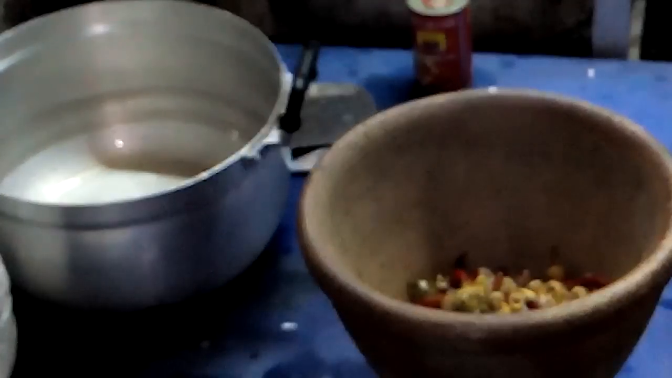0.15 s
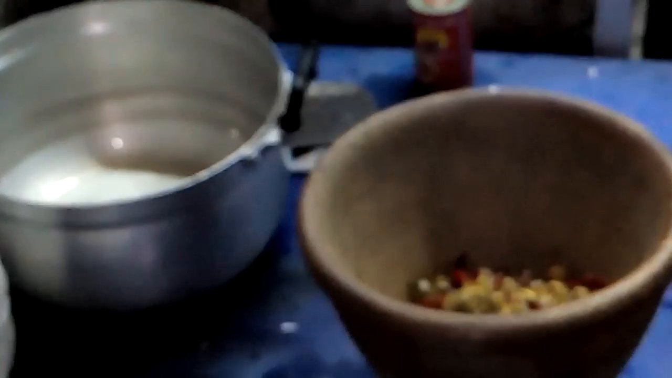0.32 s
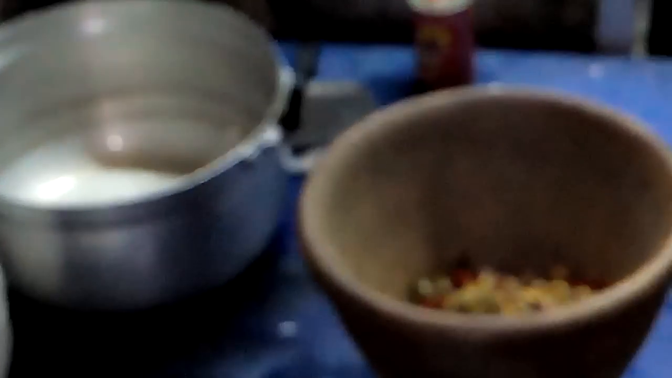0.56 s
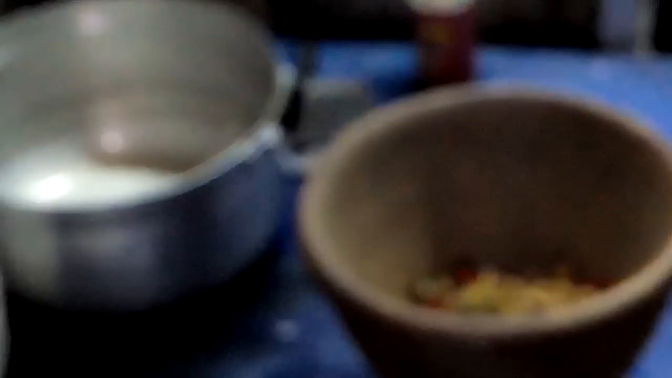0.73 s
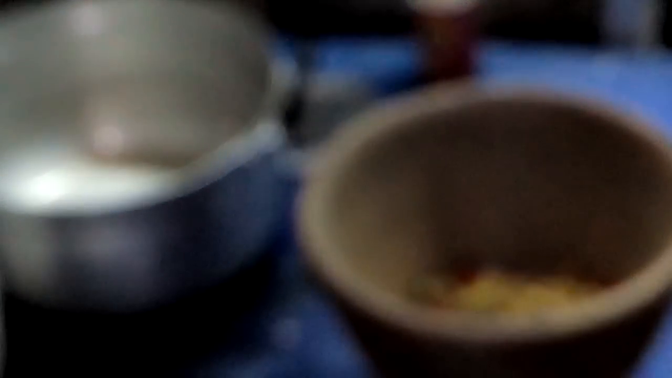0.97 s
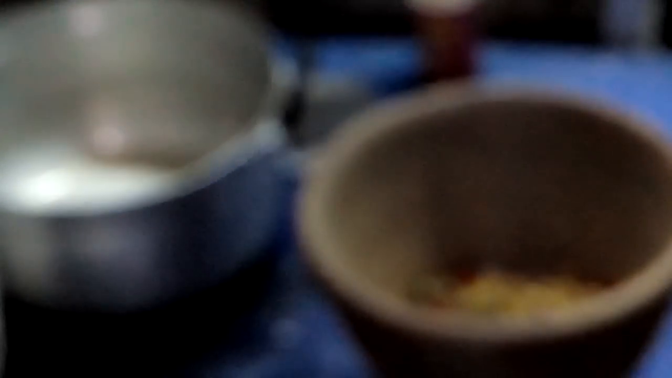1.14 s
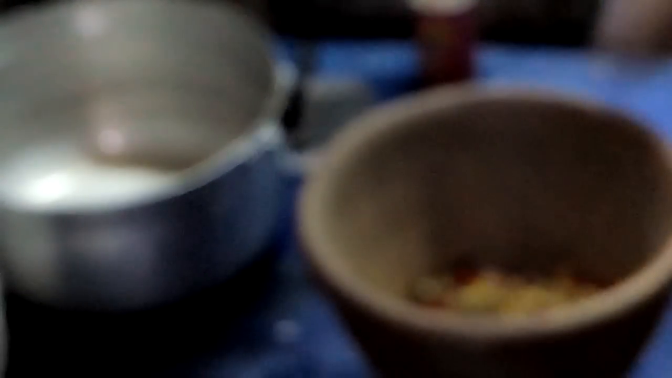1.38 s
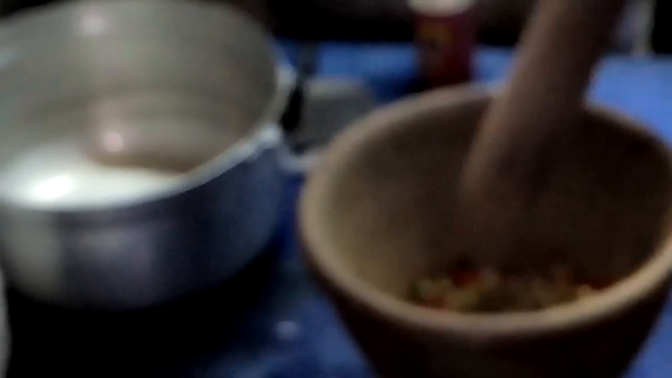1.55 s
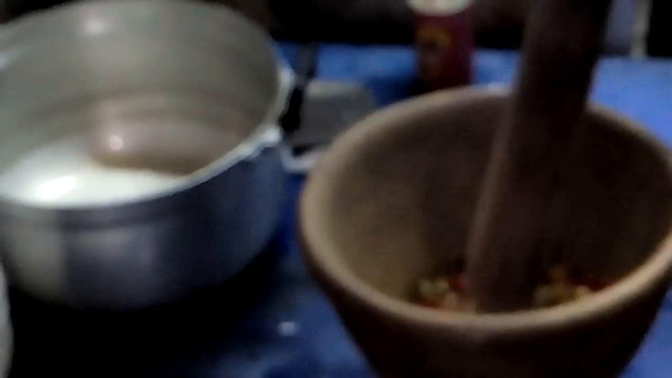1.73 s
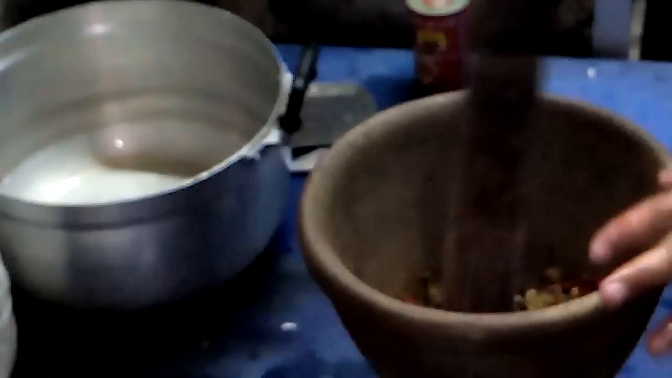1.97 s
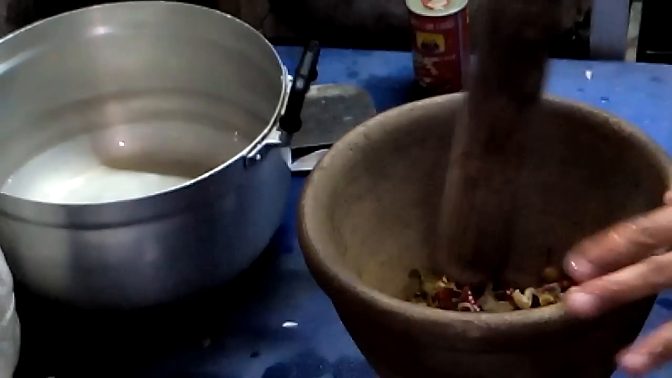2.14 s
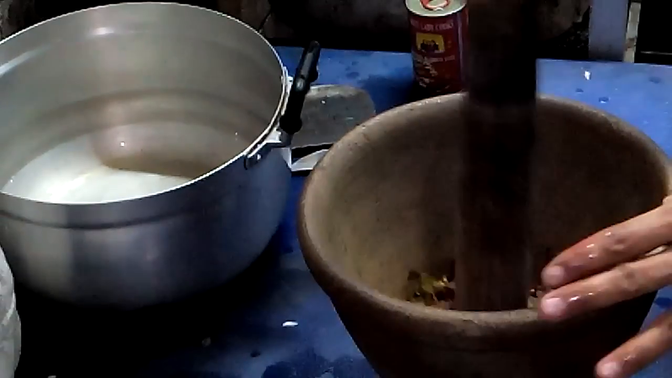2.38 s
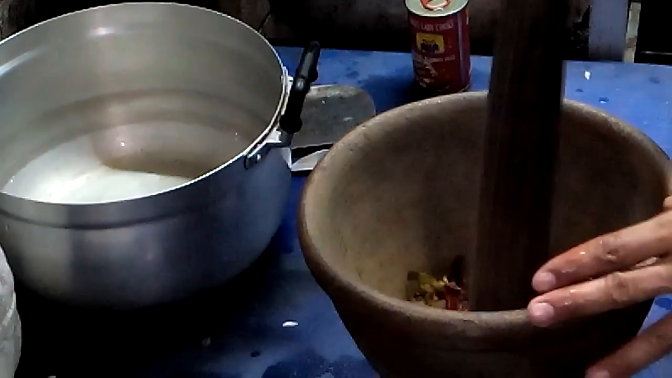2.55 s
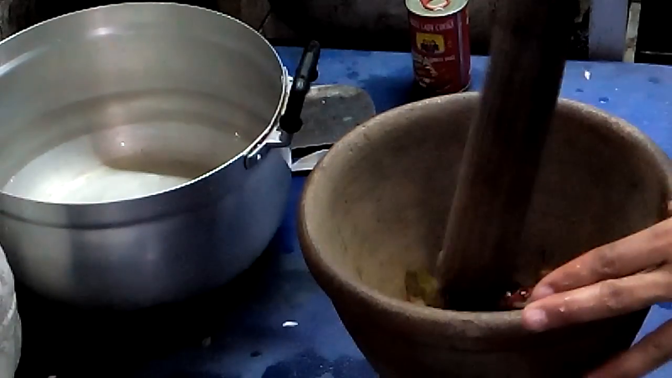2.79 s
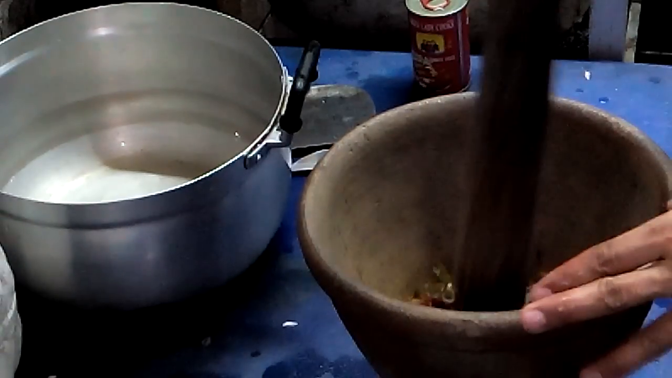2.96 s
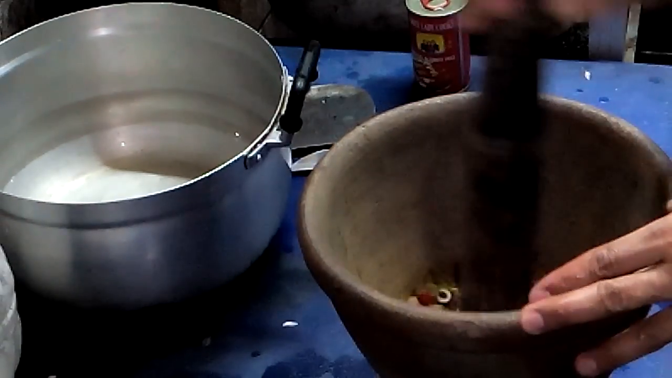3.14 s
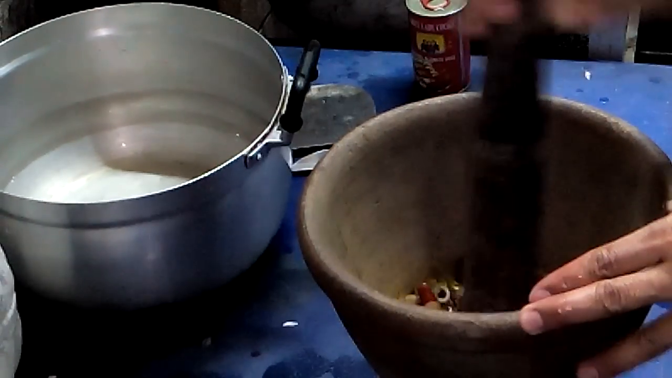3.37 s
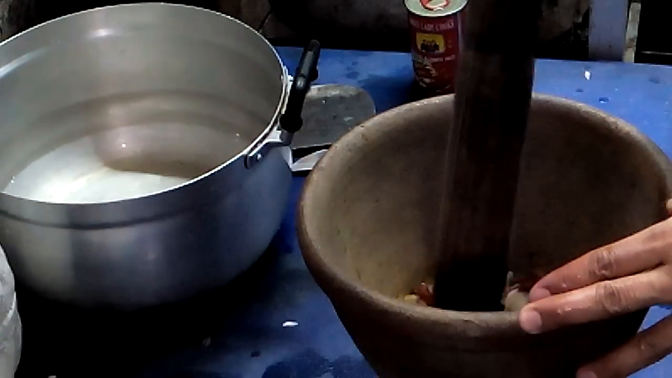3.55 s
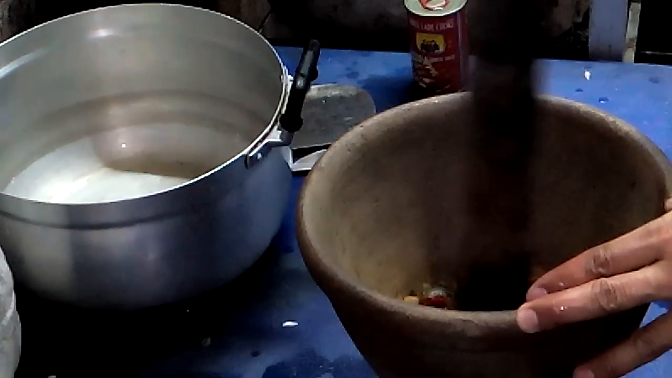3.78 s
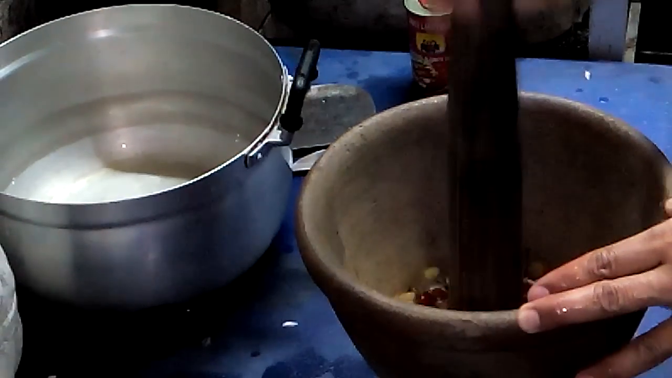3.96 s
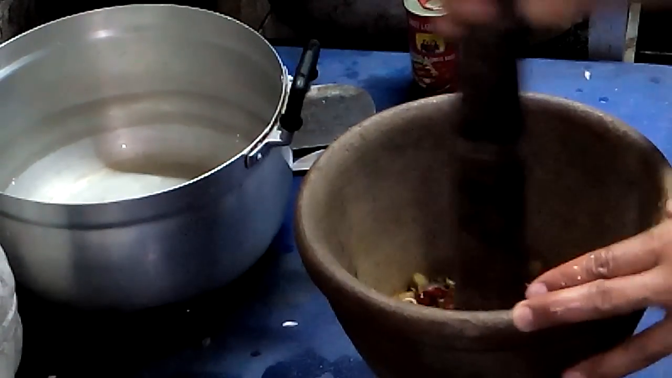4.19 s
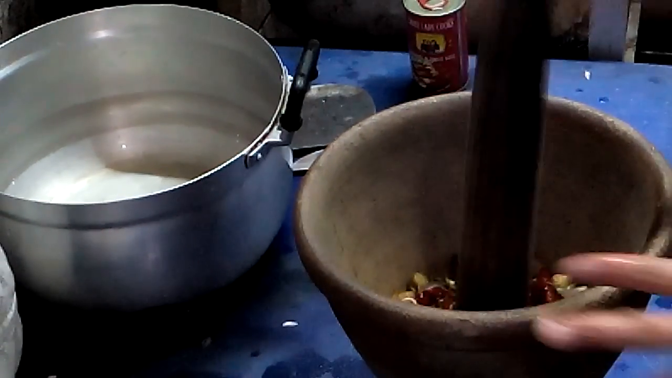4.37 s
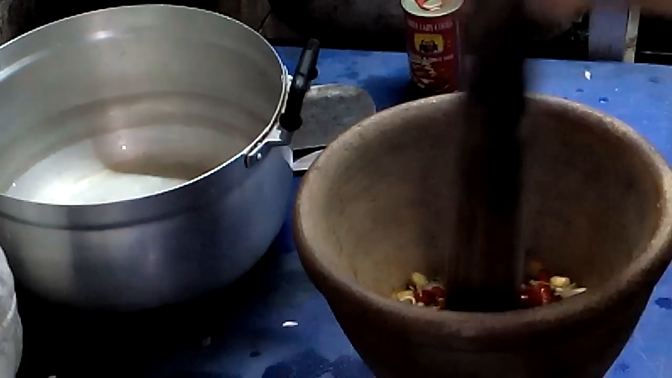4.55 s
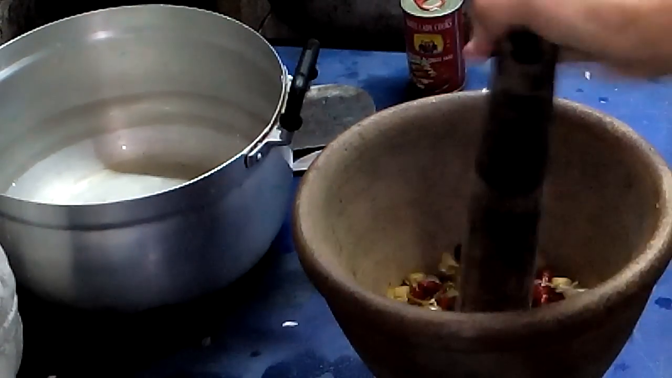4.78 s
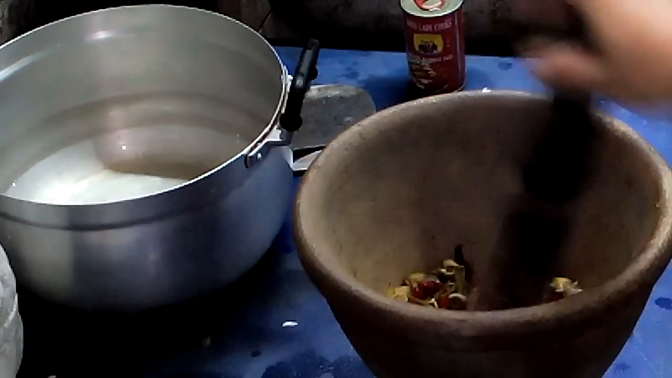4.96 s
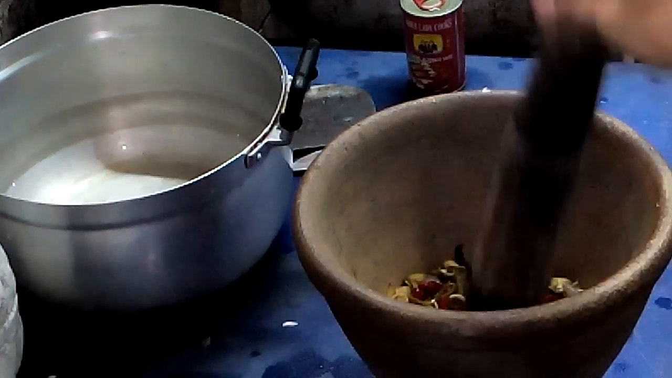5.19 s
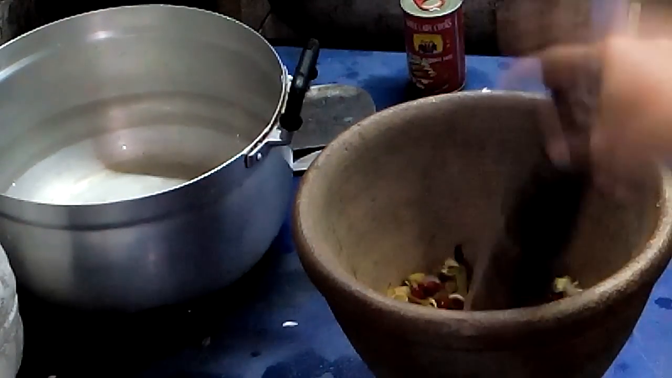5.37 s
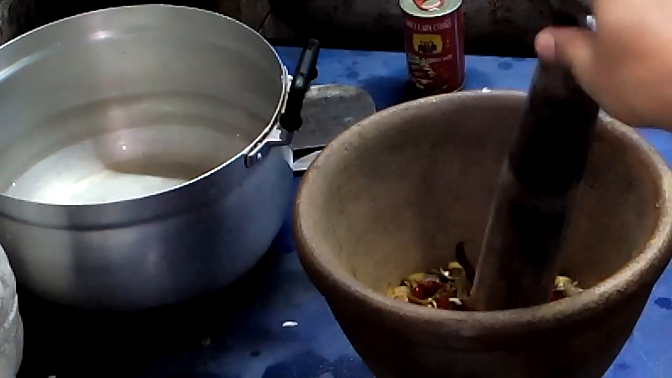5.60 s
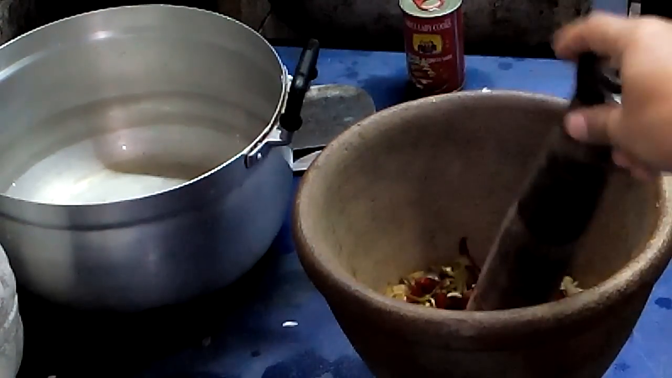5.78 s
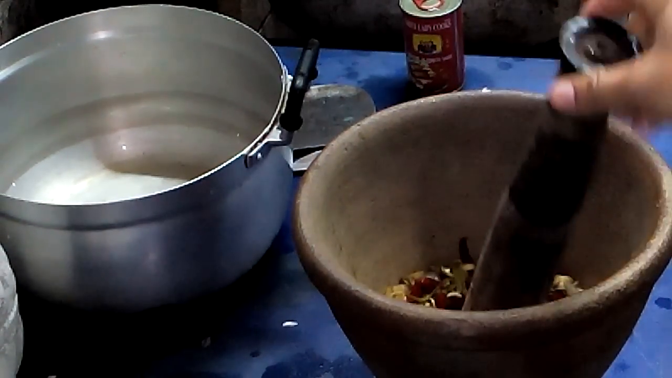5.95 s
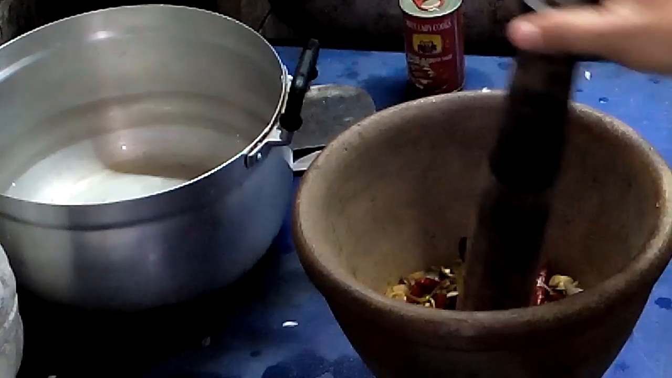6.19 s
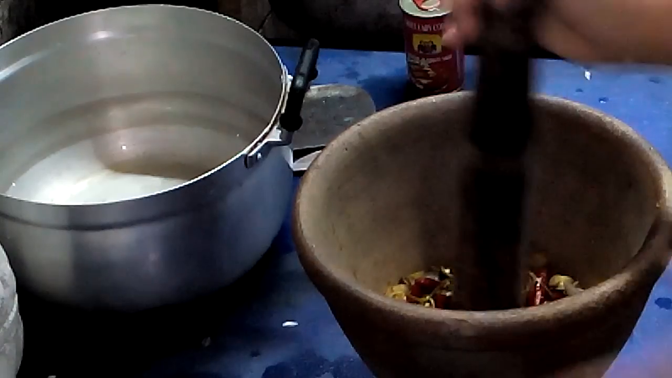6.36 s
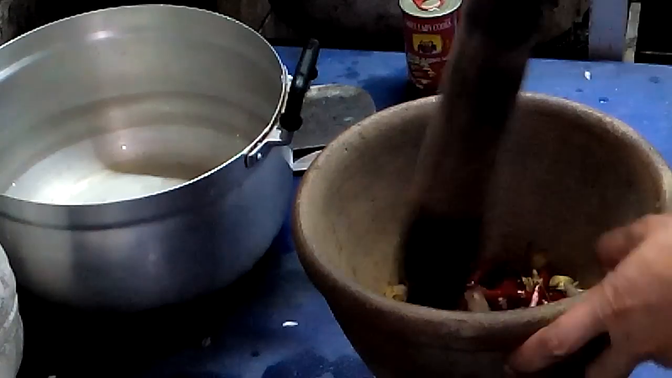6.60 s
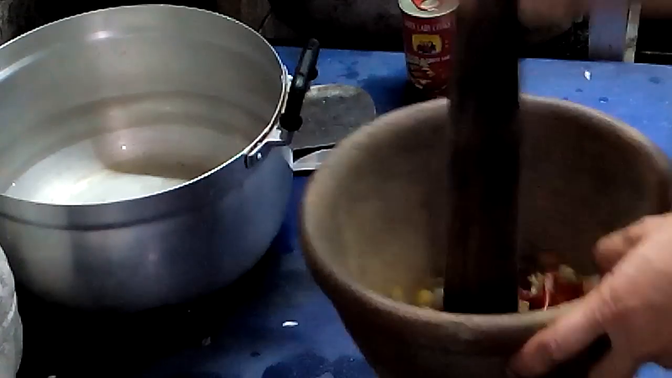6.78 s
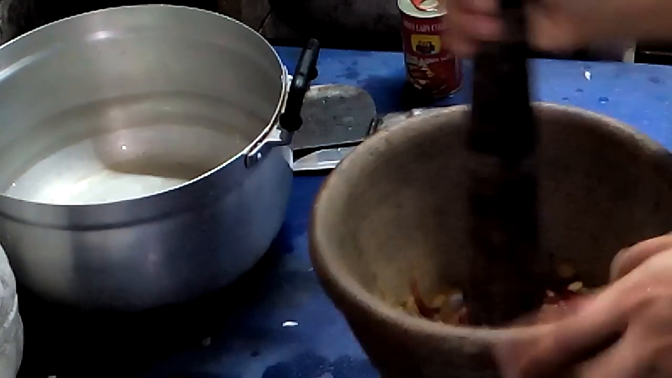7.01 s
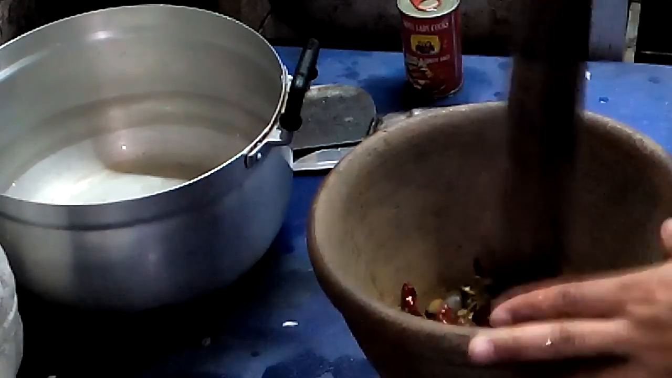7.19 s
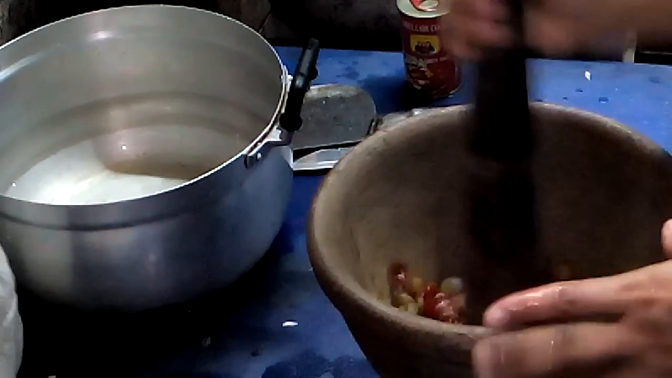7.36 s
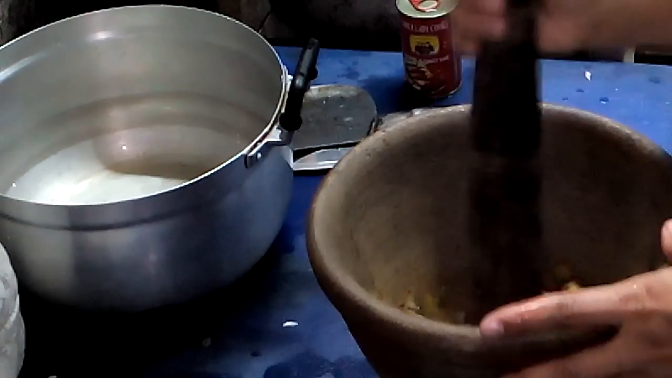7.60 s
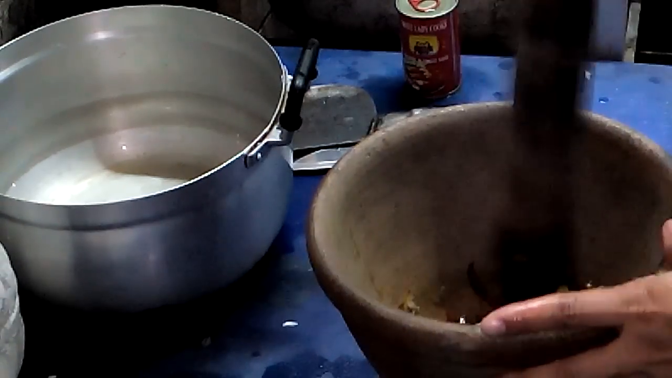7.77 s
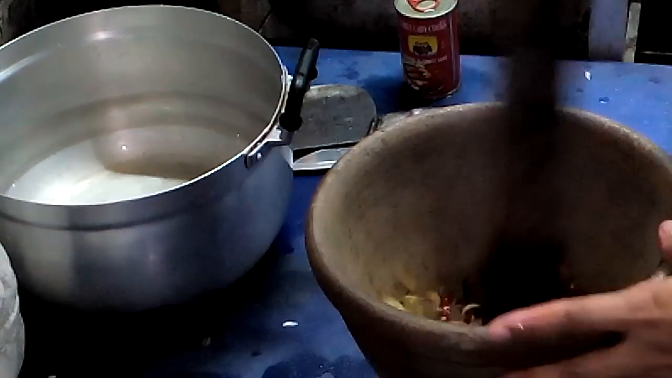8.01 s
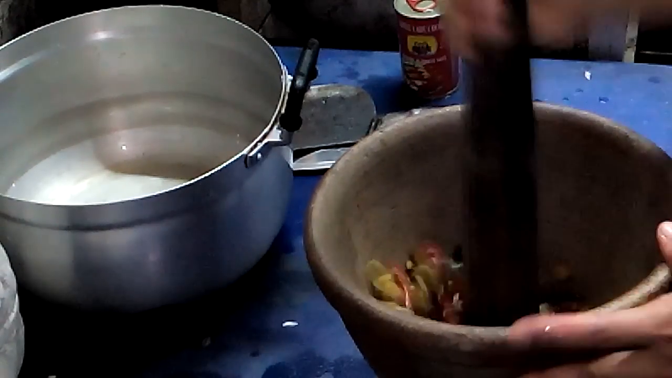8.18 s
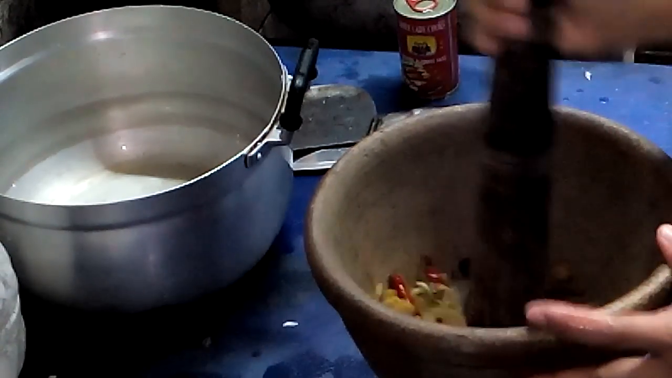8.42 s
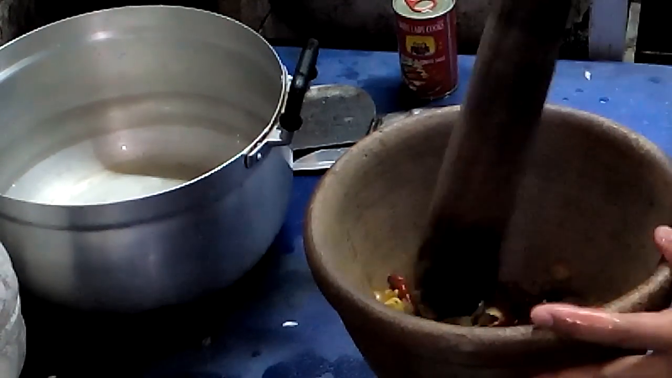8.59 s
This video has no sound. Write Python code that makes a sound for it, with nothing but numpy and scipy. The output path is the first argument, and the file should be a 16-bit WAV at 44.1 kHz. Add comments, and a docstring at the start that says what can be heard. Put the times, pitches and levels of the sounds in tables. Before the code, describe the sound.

Close to a small microphone in a modest kitchen, a pot briefly scrapes with a hollow stutter, then a wooden pestle begins crushing spices in a clay mortar. Gritty crunches and low table thumps come about four a second, peaking in a hard clay knock. Lighter taps and wet ticks follow, the mortar is dragged with a rough hiss, and heavy pounding resumes over a faint distant drone.

```python
"""Pounding spices in a clay mortar

A wooden pestle pounds chopped spices in a clay mortar on a light table in a kitchen, near a small microphone.
Each stroke crushes grit (bursts of tiny cracks), then pushes the mortar, which rocks and shakes the table
(damped modes). Hands and pestle rub the clay and a pot is pulled in jerks (shaped noise); wet ticks ping.
A far drone of filtered noise and a faint wavering whistle of gliding sines fill the room."""
import sys
import numpy as np
from scipy import signal
from scipy.fft import rfft, irfft, next_fast_len
from scipy.io import wavfile
from scipy.ndimage import uniform_filter1d, map_coordinates

SR = 44100
rng = np.random.default_rng(int(sys.argv[2]) if len(sys.argv) > 2 else 0)


def gain_from_db(level_db):
    """Turn a decibel level (scalar or array-like) into a linear amplitude factor."""
    decades = np.asarray(level_db, float) / 20
    return 10 ** decades


def store_wav(level_fs):
    """Save 16-bit WAV to argv[1]."""
    pcm = np.round(np.clip(np.atleast_2d(level_fs), -1, 1) * 32767)
    wavfile.write(sys.argv[1], SR, pcm.T.astype(np.int16))


N = 381200

# Modes of the light table. Each row: frequency in Hz, relative level in dB, t60 in seconds when free of load.
TABLE_MODES = [(72.4, -1, 0.28), (109.6, -2, 0.21), (146.9, 2.5, 0.14), (192, -8.5, 0.24),
               (259, -2.5, 0.097), (277.4, -12.5, 0.33)]
# Modes of the clay bowl. Each row: frequency in Hz, relative level in dB, t60 in seconds.
BOWL_MODES = [(398.7, -7.5, 0.14), (437.4, -10.5, 0.13), (530.7, -3, 0.095), (588, 3.5, 0.039),
              (650, -7, 0.052), (739, -12.5, 0.15), (828, -7.5, 0.086), (959, 3, 0.043), (1096, -9.5, 0.1),
              (1147, -8, 0.12), (1382, 1.5, 0.038), (1460, -3, 0.075), (1543, -0.5, 0.054),
              (1653, -8.5, 0.086)]
# Colour of grit and rough clay. Each row: frequency in Hz, relative level in dB per Hz.
GRIT_COLOUR = [(500, -9), (900, -2.5), (2500, 3.5), (6700, -4.5), (7500, -8), (8800, -31), (11000, -74)]


def unit(x):
    """Scaled to rms 1."""
    return x / np.sqrt(np.mean(x ** 2) + 1e-20)


def along(points, hz):
    """Interpolates (Hz, value) points on a log frequency axis."""
    f, v = np.transpose(points)
    return np.interp(np.log(hz + 1), np.log(f + 1), v)


def wobble(rate):
    """A smooth random curve with rate knots a second."""
    knots = rng.standard_normal(int(N * rate / SR) + 4)
    return map_coordinates(knots, [np.arange(N) * rate / SR])


def filtered(x, response):
    """The sound through a complex response of frequency."""
    m = next_fast_len(N + SR // 2)
    return irfft(rfft(x, m) * response(np.fft.rfftfreq(m, 1 / SR)), m)[..., :N]


def resonant(peaks):
    """The causal response of (Hz, width in Hz, dB) resonances, summed in alternating polarity."""
    def response(f):
        return sum((-1) ** k * gain_from_db(db) * 1j * f * width / (hz * hz - f * f + 1j * f * width)
                   for k, (hz, width, db) in enumerate(peaks))
    return response


def patchy(x, depth_db, size):
    """The sound with patches of random gain over time and frequency."""
    z = signal.stft(np.pad(x, (0, size)), nperseg=size)[2]
    field = uniform_filter1d(rng.standard_normal(z.shape), size=8, axis=0)
    field = uniform_filter1d(field, size=10, axis=1)
    return signal.istft(z * gain_from_db(depth_db * unit(field)), nperseg=size)[1][:N]


def gritty(spread_db, grain_ms):
    """Noise made of equally long grains of unequal strength."""
    size = max(int(grain_ms * SR / 1000), 1)
    strengths = np.repeat(gain_from_db(spread_db * rng.standard_normal(N // size + 1)), size)[:N]
    return unit(strengths * rng.standard_normal(N))


def grains(rate, spread_db, cycles):
    """Tiny cracks of random pitch and size, rate a second, each fading by 1/e in the given cycles."""
    when, tone, size = rng.random((int(rate * N / SR), 3)).T[:, :, None]
    hz = 1100 * 7 ** tone
    k = np.arange(128)
    strength = gain_from_db(-spread_db * np.log(size + 0.055)) * np.sqrt(hz)
    cracks = strength * np.sin(2 * np.pi * hz * k / SR) * np.exp(-hz * k / SR / cycles)
    places = (when * N).astype(int) + k
    return unit(np.bincount(places.ravel(), cracks.ravel(), N + 256)[:N])


def ring(modes, attack_s, scatter_db):
    """Damped (Hz, dB, t60) modes, struck at randomly scattered strengths and scaled to peak 1."""
    hz, db, t60 = np.transpose(modes)[:, :, None]
    t = np.arange(int(SR * t60.max())) / SR
    luck = scatter_db * rng.standard_normal(db.shape)
    x = np.sum(gain_from_db(db + luck - 60 * t / t60) * np.sin(2 * np.pi * hz * t), axis=0)
    x = x * (1 - np.exp(-t / attack_s))
    return x / np.abs(x).max()


def stroke(s, length, lean):
    """A swell from 0 to 1 and back; a lean under 1 peaks early."""
    return np.sin(np.pi * np.clip((np.arange(N) / SR - s) / length, 0, 1) ** lean)


def add(track, s, sound):
    """Mixes a sound in at time s."""
    track[round(s * SR):][:len(sound)] += sound


def drone():
    """Far traffic and air: coloured noise in faint patches."""
    # Colour of the drone. Each row: frequency in Hz, relative level in dB per Hz.
    drone_colour = [(20, -29), (54, 2), (100, 0.5), (150, -2.5), (195, -10.5), (284, -10), (500, -14),
                    (1500, -18), (6900, -26.5), (8800, -47), (11000, -90)]
    level_db = -52  # rms
    air = patchy(rng.standard_normal(N), depth_db=1.4, size=512)
    return gain_from_db(level_db) * unit(filtered(air, lambda hz: gain_from_db(along(drone_colour, hz))))


def whistle():
    """Fuzzy far tones: sines that glide and waver in pitch and level."""
    # Thin tones. Each row: start in seconds, length in seconds, first Hz, last Hz,
    # rms level in dB at the top of the swell, before wavering.
    tones = [(0.031, 0.063, 1885, 1880, -52), (5.12, 0.71, 1230, 1330, -65.5),
             (5.19, 0.51, 2075, 2090, -68), (5.617, 0.3, 887, 886, -66.5), (5.797, .3, 1450, 1486, -71),
             (5.913, 0.19, 976, 983, -55), (6.13, 0.2, 947, 933, -64)]
    out, now = np.zeros(N), np.arange(N) / SR
    for s, length, first_hz, last_hz, db in tones:
        pitch = np.interp(now, [s, s + length], [first_hz, last_hz]) + 17 * wobble(90)
        tone = np.sqrt(2) * np.sin(2 * np.pi * np.cumsum(pitch) / SR)
        out += stroke(s, length, lean=0.68) * gain_from_db(db + 4.8 * wobble(22)) * tone
    return out


def rubbing():
    """Skin and wood slide over rough clay: friction gives a fine hiss and coarser grains."""
    # Short rubs on the clay. Each row: start in seconds, length in seconds, hiss level in dB, coarse level in dB.
    rubs = [(0.053, 0.04, -53, -54), (0.24, 0.054, -70, -53.5), (1.691, 0.11, -55, -67),
            (2.112, 0.14, -53.5, -55), (2.38, 0.023, -55, -82), (2.893, 0.15, -55, -57.5),
            (3.091, 0.16, -53.5, -68), (7.728, .11, -46, -44.5), (8.433, 0.15, -48, -45.5)]
    # The mortar is dragged. Each row: time in seconds, speed as a hiss level in dB.
    slide = [(6.6, -67), (6.695, -59), (6.71, -49.5), (6.77, -46.5), (6.81, -46), (6.9, -40),
             (6.959, -47.5), (7.02, -61), (7.101, -72)]
    coarse_db, coarse_lag_s = -3, 0.019  # in the slide: coarse grains over the hiss, catching later
    times, slide_db = np.transpose(slide)
    hiss = gain_from_db(np.interp(np.arange(N) / SR, times, slide_db, left=-120, right=-120))
    coarse = gain_from_db(coarse_db) * np.roll(hiss, round(coarse_lag_s * SR))
    # the slide catches unevenly
    hiss = hiss * gain_from_db(1.5 * wobble(60))
    coarse = coarse * gain_from_db(2.5 * wobble(80))
    for s, length, rub_hiss_db, rub_coarse_db in rubs:
        swell = stroke(s, length, lean=0.71)
        hiss = hiss + gain_from_db(rub_hiss_db) * swell
        coarse = coarse + gain_from_db(rub_coarse_db) * swell

    def fine_colour(hz):
        return gain_from_db(along(GRIT_COLOUR, hz)) * (hz / 3500) ** 3 / (1 + (hz / 3500) ** 3)

    def rough_colour(hz):
        return gain_from_db(along(GRIT_COLOUR, hz)) / (1 + (hz / 3000) ** 4)

    fine = filtered(gritty(spread_db=2.0, grain_ms=1.2), fine_colour)
    rough = filtered(gritty(spread_db=0.5, grain_ms=2.8), rough_colour)
    return hiss * unit(fine) + coarse * unit(rough)


def ticks():
    """Small wet ticks and pings: clusters of modes, the higher the shorter; fainter crumbs settle at random."""
    # Ticks. Each row: start in seconds, peak level in dB, frequency in Hz about which the modes cluster.
    pings = [(2.344, -47.5, 3500), (4.87, -40, 4530), (5.11, -41.5, 6500), (5.248, -47, 6340),
             (6.018, -36.5, 5600), (6.411, -45, 4420), (6.443, -46, 6507), (7.415, -49, 6570),
             (7.716, -43.5, 4900)]
    out = np.zeros(N + SR)
    crumbs = rng.random((70, 3)) * [N / SR, 8, 4500] + [0, -55, 2800]  # same columns
    for s, db, hz in [*pings, *crumbs]:
        cluster = [(hz * ratio, 0, 120 / hz) for ratio in (.9, 1, 1.08, 1.2)]
        add(out, s, gain_from_db(db) * ring(cluster, attack_s=.001, scatter_db=3))
    return out[:N]


def knocks():
    """The bowl is knocked or lands on its foot: a sharp contact rings its modes, by where it is hit."""
    # Knocks. Each row: start in seconds, peak of the low modes in dB, high modes over them in dB,
    # off-centre share from 0 to 1.
    blows = [(.254, -31, -12, 0.17), (0.855, -32, -8, 0.45), (2.756, -49, 14, 0.1),
             (3.345, -32.5, -19, 0.38), (3.602, -33.5, -5, 0.6), (4.144, -30, -9, 0.61),
             (4.64, -10, -9.5, 0.25), (4.689, -15, -15, 0.39), (4.736, -26.5, -2.5, 0.68),
             (4.928, -27.5, -17, 0.2), (4.99, -39, -4, 0.98), (5.153, -42.5, -13, 0.58),
             (6.84, -45, -1, 0.97), (7.04, -44, -8, 0.36), (7.49, -5, -4, 0), (7.521, -23, -13, 0.58),
             (7.55, -24, -8, 0.44), (8.091, -23, -13, 0.69), (8.588, -36, 2.5, 0.25)]
    # Borders between the low, middle and high bowl modes, in Hz.
    split_hz = [800, 1280]
    centre_db, rim_db = -16.5, 9  # middle modes over the low ones, for a blow in the centre and near the rim
    contact_ms, softer = 1.35, 0.15  # contact of a 0 dB knock; a weaker one lasts longer, by this share of its dB
    out = np.zeros(N + SR)
    group = np.searchsorted(split_hz, [mode[0] for mode in BOWL_MODES])
    for s, low_db, high_db, off_centre in blows:
        contact_s = contact_ms / 1000 * gain_from_db(-softer * low_db)
        middle_db = centre_db + (rim_db - centre_db) * off_centre
        for k, db in enumerate([low_db, low_db + middle_db, low_db + high_db]):
            modes = np.array(BOWL_MODES)[group == k]
            add(out, s, gain_from_db(db) * ring(modes, attack_s=contact_s, scatter_db=2.5))
    return out[:N]


def drag():
    """A hollow pot stutters over a surface: uneven slips ring its cavity over a scrape."""
    # Jerks of the pot. Each row: start in seconds, length in seconds, hollow tone in dB, scrape in dB.
    jerks = [(0.327, 0.055, -53, -51.5), (0.376, 0.1, -47.5, -53.5), (0.487, 0.11, -42, -45.5)]
    # Cavity resonances. Each row: frequency in Hz, width in Hz, relative level in dB.
    cavity = [(440, 47, 7.5), (940, 340, -7.5)]
    slips_per_s, slip_ms = 51, 0.79  # usual rate, which wavers; a slip is a soft shove
    swells = np.array([stroke(s, length, lean=0.74) ** 0.47 for s, length, *_ in jerks])
    tone, scrape = gain_from_db(np.array(jerks)[:, 2:]).T @ swells
    turns = np.cumsum(slips_per_s * gain_from_db(1.6 * wobble(30))) / SR
    slips = np.diff(np.floor(turns), prepend=0) * gain_from_db(3.0 * wobble(39.8))  # one click a turn
    grit = gritty(spread_db=0, grain_ms=1.8)

    def hollow_colour(hz):
        return resonant(cavity)(hz) / (1 + 2j * hz * slip_ms / 1000) ** 2

    def scrape_colour(hz):
        return resonant([(1000, 900, -4), (2100, 1100, 0)])(hz) / (1 + hz / 9000)

    hollow = filtered(unit(slips) + 0.75 * grit, hollow_colour)
    return tone * unit(hollow) + scrape * unit(filtered(grit, scrape_colour))


def crush():
    """Grit cracks under the pestle, loudest just after contact, and rings the wood."""
    # Bites into the grit. Each row: contact in seconds, grit level in dB, level in dB of the wood under it
    # (both before the trims below), rise in ms.
    bites = [(0.856, -38, -36, 9.7), (2.474, -27.5, -31, 19), (2.752, -26.5, -24.5, 8),
             (3.013, -25, -25.5, 16), (3.285, -22, -22, 8), (3.346, -38, -32, 6.3), (3.54, -25.5, -28, 18),
             (3.556, -42, -35, 4), (3.601, -48, -35, 19), (3.803, -28, -23, 33), (4.07, -27, -21.5, 12),
             (4.145, -27, -29, 6.7), (4.354, -25, -22.5, 5.7), (4.636, -22, -28, 4.6),
             (4.686, -22.5, -20, 8.3), (4.922, -22, -26, 6), (5.153, -43.5, -45, 8),
             (5.566, -28.5, -25.5, 9.4), (5.894, -30, -34, 7), (6.225, -30.5, -63, 6.1),
             (7.173, -32, -28, 46), (7.277, -39, -42, 5), (7.466, -28.5, -27, 13), (7.49, -26.5, -42, 4.3),
             (7.533, -29.5, -21, 3.8), (8.016, -27, -24, 37), (8.084, -25, -23.5, 5.8),
             (8.29, -34.5, -40, 23), (8.321, -29, -31, 4.8), (8.567, -28, -30, 32)]
    # Resonances of the wooden pestle. Each row: frequency in Hz, width in Hz, relative level in dB.
    pestle = [(585, 140, -2.5), (922, 80, -1), (1239, 140, -0.5), (1378, 49, 0), (1678, 123, -4),
              (2104, 67, 4.5), (2560, 41, -20), (2680, 69, -0.5)]
    # The pestle leans on the bowl and only taps: first and last time in seconds.
    leaning = [5.5, 6.5]
    settle_s, settle_rise_ms = 0.27, 46  # t60 after a sudden bite; one that rises this slowly takes half the time
    tap_settle = 0.65  # settling time of a tap over that of a blow
    wood_damping_db_per_s = 47  # the pulp closing round the pestle deadens it
    ring_loss_db_per_ms = 0.73  # the pestle rings once as the bite rises, less after a slow bite
    bright, woody, struck = np.zeros((3, N + SR))
    t = np.arange(SR // 3) / SR
    modes = [(hz, db, np.log(1000) / np.pi / width) for hz, width, db in pestle]
    for s, db, wood_db, rise_ms in bites:
        t60 = settle_s / (1 + rise_ms / settle_rise_ms)
        if leaning[0] < s < leaning[1]:
            t60 *= tap_settle
        # a short burst as the pieces split, then the slower settling
        shape = gain_from_db(-60 * t / t60) + 0.83 * gain_from_db(-60 * t / 0.085)
        shape = shape * (1 - np.exp(-(1000 * t / rise_ms) ** 2))
        shape = shape / shape.max()
        add(bright, s - .006, gain_from_db(db - 10.5) * shape)
        add(woody, s - .006, gain_from_db(wood_db - 14.5 - wood_damping_db_per_s * t) * shape)
        ring_db = wood_db - ring_loss_db_per_ms * rise_ms
        add(struck, s + rise_ms / 2000, gain_from_db(ring_db) * ring(modes, attack_s=.0012, scatter_db=4.5))
    cracks = grains(rate=3000, spread_db=3.0, cycles=0.93) + 1.5 * gritty(spread_db=2, grain_ms=0.94)
    cracks = patchy(cracks, depth_db=1.0, size=256)  # each bite meets other pieces
    grit = unit(filtered(cracks, lambda hz: gain_from_db(along(GRIT_COLOUR, hz)) * hz / (hz + 2500)))
    wood = unit(filtered(cracks, resonant(pestle)))
    return struck[:N] + bright[:N] * grit + woody[:N] * wood


def rocking():
    """The pestle presses and the mortar rocks: soft pushes favour table modes near their pitch, jostling the bowl."""
    # Presses. Each row: start in seconds, length in seconds, first push in dB, last push in dB
    # (both before the trims below), pitch of the pushes in Hz.
    presses = [(3.018, .0, -35.5, -35.5, 86), (3.3, 0.055, -23, -27, 124), (3.553, 0.035, -25, -20.5, 155),
               (3.808, 0.063, -31, -26.5, 147), (4.088, 0.053, -17, -17.5, 151),
               (4.359, 0.047, -14.5, -21.5, 150), (4.639, 0.1, -4, -23.5, 143),
               (4.93, 0.059, -15.5, -25.5, 147), (5.575, 0.039, -24, -23, 114),
               (5.903, 0.016, -31.5, -29.5, 94), (7.216, 0.048, -22.5, -41.5, 141),
               (7.491, .059, -9, -21, 136), (7.776, 0, -22.5, -30, 139), (8.047, 0.064, -17, -20, 122.5),
               (8.299, 0.06, -29, -19, 136), (8.596, 0.02, -18.5, -15.5, 150)]
    rock_s = .028  # usual time between pushes
    hold = 0.92  # over 1, the weight stays on and lifts late in the press
    loaded, shift_db = 0.64, 0.36  # table t60 under full weight over its free t60; random pitch shift, as 20 log10
    rattle_db, rattle_s = -25.5, 0.13  # the rocking bowl buzzes in its own modes: level under the push, t60
    out, jostle, rattle = np.zeros((3, N + SR))
    t = np.arange(SR // 4) / SR
    for start, length, first_db, last_db, push_hz in presses:
        for u in np.linspace(0, 1, num=1 + round(length / rock_s)):  # share of the press gone by
            s = start + length * u
            db = first_db + (last_db - first_db) * u ** hold
            favoured = [(hz, level - 16 * np.log2(hz / push_hz) ** 2, t60) for hz, level, t60 in TABLE_MODES]
            shift = gain_from_db(shift_db * rng.standard_normal())
            favoured = np.array(favoured) * [shift, 1, loaded ** (1 - u)]
            add(out, s, gain_from_db(db - 2.5) * ring(favoured, attack_s=0.012, scatter_db=3.0))
            add(jostle, s, gain_from_db(db - 19.5 - 60 * t / 0.25) * (1 - np.exp(-t / 0.0035)))
            add(rattle, s, gain_from_db(db + rattle_db - 60 * t / rattle_s) * (1 - np.exp(-t / 0.011)))
    # the foot chatters on the board
    foot = filtered(gritty(spread_db=1.0, grain_ms=4.8), resonant([(273, 122, 5), (618, 1700, -13)]))
    bowl = resonant([(hz, 3 / t60, db) for hz, db, t60 in BOWL_MODES])
    buzz = filtered(gritty(spread_db=3, grain_ms=4.6), bowl)
    return out[:N] + jostle[:N] * unit(foot) + rattle[:N] * unit(buzz)


def trembling():
    """The table trembles as the mortar is shifted: noise through its four lowest modes."""
    # One tremble: start in seconds, length in seconds, rms level in dB at the top of the swell.
    s, length, db = (6.457, 1, -42.5)
    board = filtered(rng.standard_normal(N), resonant([(hz, 18, level) for hz, level, _ in TABLE_MODES[:4]]))
    return gain_from_db(db) * stroke(s, length, lean=1.97) * unit(board)


def kitchen(x):
    """The walls answer; each quarter second of sound gets its own tail, each frequency its own decay."""
    # Decay of the room. Each row: frequency in Hz, t60 in seconds.
    decay = [(100, 0.42), (2000, 0.31), (8000, 0.17)]
    out, size = np.zeros(N + SR), SR // 4
    for start in range(0, N, size):
        hz, t, z = signal.stft(rng.standard_normal(SR // 2), SR, nperseg=256)
        fade = gain_from_db(-60 * t / along(decay, hz)[:, None])
        tail = signal.istft(z * fade, SR, nperseg=256)[1]
        tail = tail / np.linalg.norm(tail)
        add(out, start / SR + .006, signal.fftconvolve(x[start:start + size], tail))
    return out[:N]


def scene():
    """The mortar close by, in the room, with the far whistle and drone."""
    near = rubbing() + ticks() + knocks() + drag() + crush() + rocking() + trembling()
    return (near + gain_from_db(-8) * kitchen(near) + whistle() + drone())[None]


def low_pass(x):
    """Removes everything above the highest recorded frequency."""
    return signal.sosfilt(signal.butter(12, 9010, fs=SR, output="sos"), x)


def record(dry):
    """A small microphone, weak in the deepest bass and the high treble."""
    # Microphone response. Each row: frequency in Hz, gain in dB.
    mic_gain = [(25, -15), (48, 2.5), (70, 1.5), (8000, -0.5), (9200, -10)]
    mix = filtered(dry, lambda hz: gain_from_db(along(mic_gain, hz)))
    return low_pass(mix)


dry = scene()
out = record(dry)
store_wav(out)
```